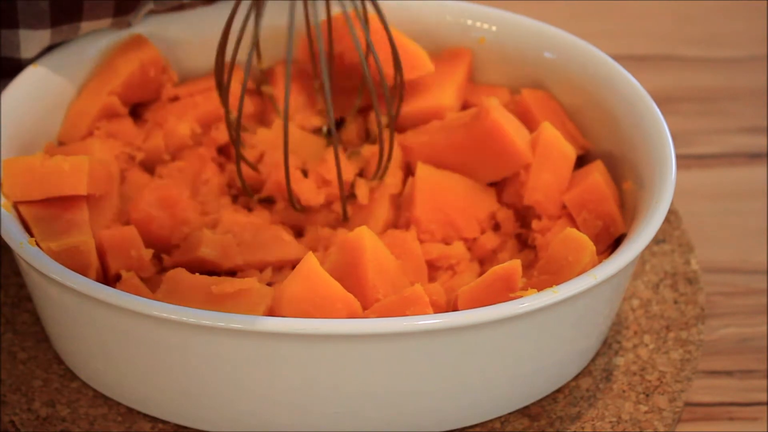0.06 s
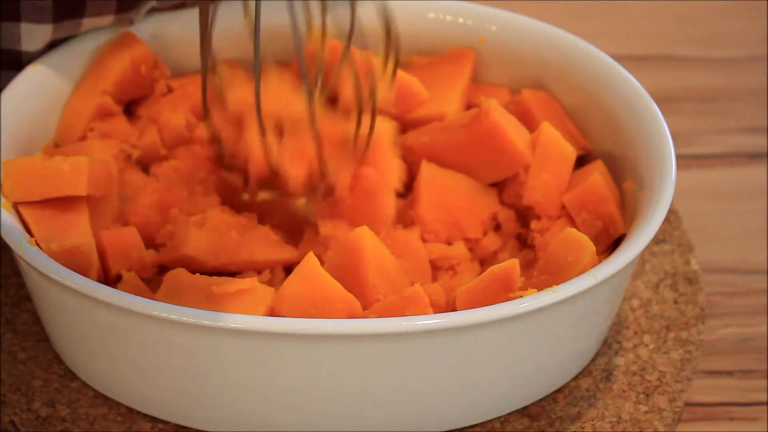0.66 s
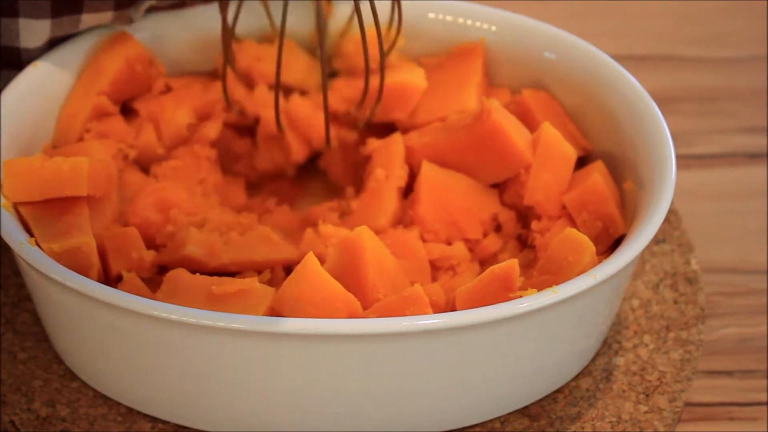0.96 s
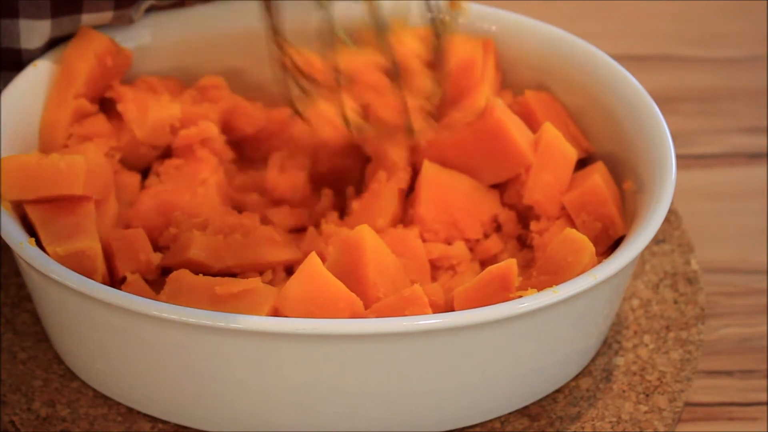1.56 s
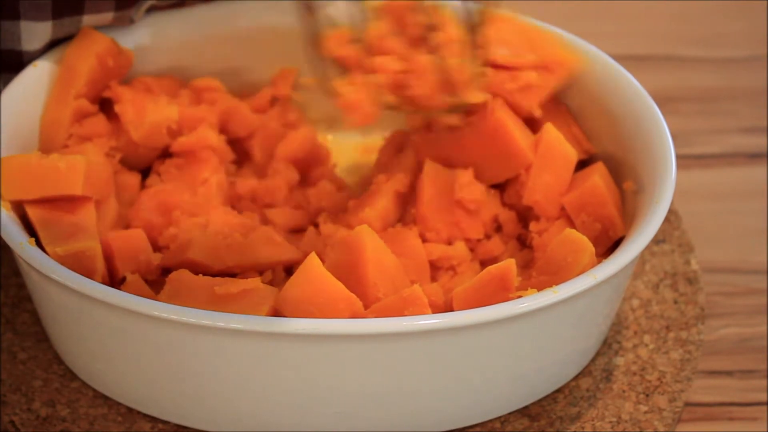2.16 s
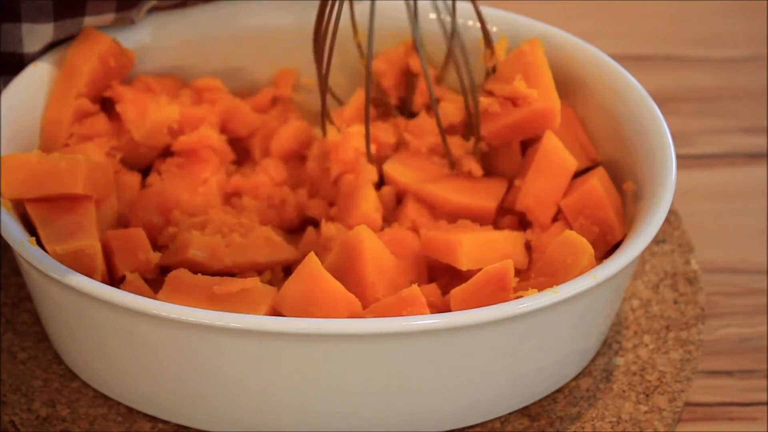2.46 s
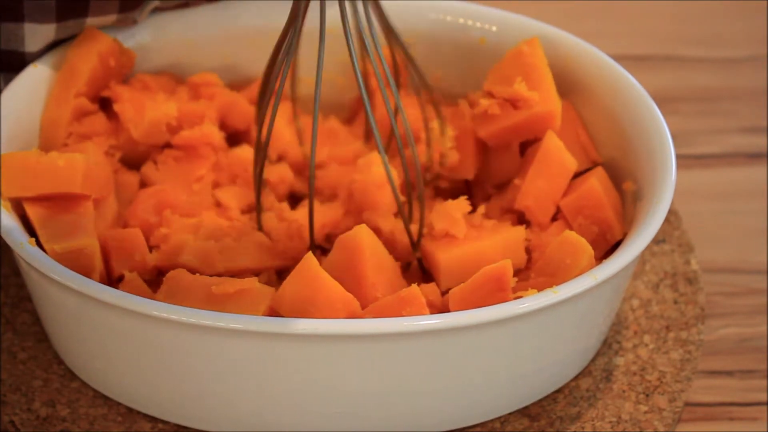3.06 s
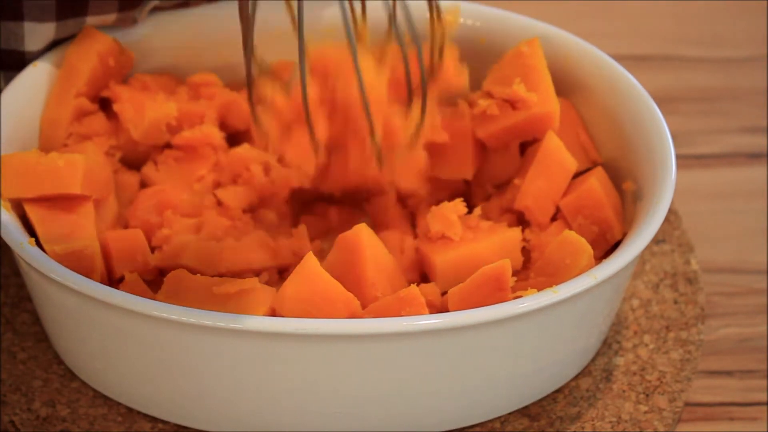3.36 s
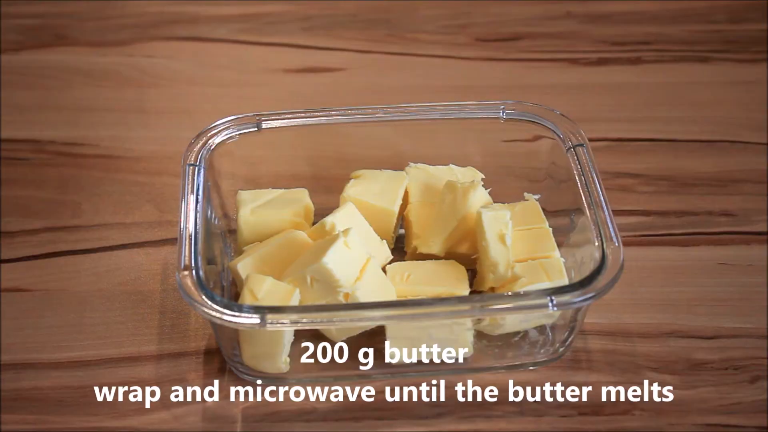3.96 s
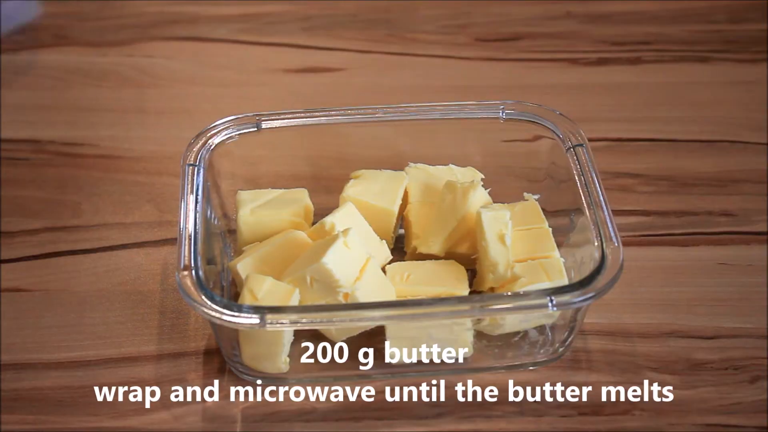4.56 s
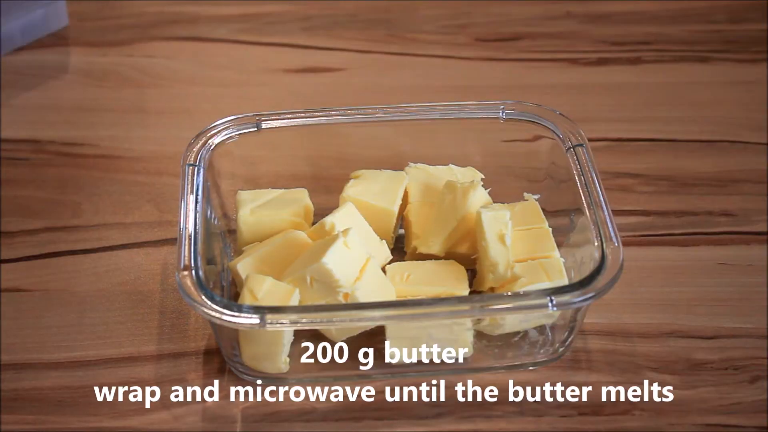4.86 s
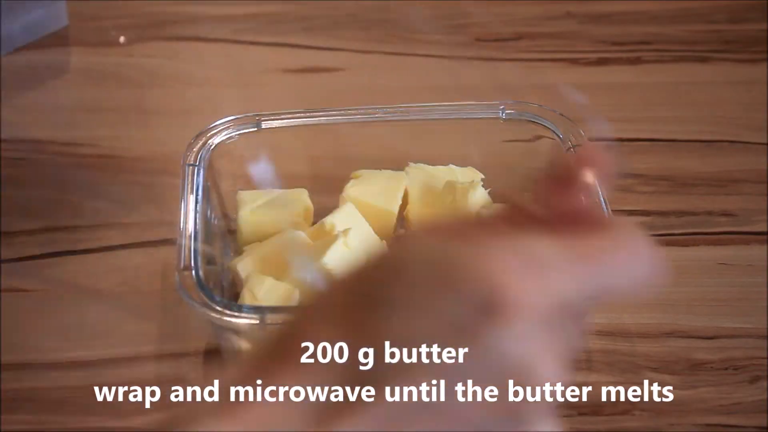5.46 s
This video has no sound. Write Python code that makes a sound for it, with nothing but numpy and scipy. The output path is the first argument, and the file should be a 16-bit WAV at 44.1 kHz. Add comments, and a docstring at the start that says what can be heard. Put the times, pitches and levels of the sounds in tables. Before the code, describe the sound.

From the start, a wire whisk mashes cooked pumpkin in a ceramic dish, close up, over the soft rush of a kitchen. Uneven strokes bring quiet wet squelches, small air pops and a low table rumble. The wires clink on the bottom with dull thumps at about 0.4, 1.2, 1.8, 3.1 and 3.6 seconds. At 0.9 seconds the whisk knocks sharply on the side wall, ringing briefly, and the dish clacks back onto its mat at 1 second. Pops cluster around 2.3 and 3 seconds. The mashing ends near 3.85 seconds, and plastic wrap immediately peels off its roll in crackling tugs, the roll rumbling in its box, strongest around 4.2 seconds. Just after 4.5 seconds the cutter snaps twice in quick succession, loud and briefly echoing. From 5 seconds the loose sheet crinkles faintly until the end at about 5.7 seconds.

```python
"""Cooked pumpkin squelches under a wire whisk: trapped air pops, the wires clink on the ceramic dish
and the table thumps. The lifted whisk knocks the side wall and the dish drops back on its mat.
Then plastic wrap peels off its roll in countless tiny slips, the cutter of the box snaps shut twice
and sets the kitchen reverberating, and the loose sheet crinkles faintly as it is carried over.
A soft rush of the room lies under it all."""
import sys
import numpy as np
from scipy import signal
from scipy.fft import rfft, irfft
from scipy.io import wavfile
from scipy.ndimage import uniform_filter1d

SR = 44100
rng = np.random.default_rng(int(sys.argv[2]) if len(sys.argv) > 2 else 0)


def file_out(sig):
    """Save sig as 16-bit WAV at sys.argv[1]."""
    # one column per channel
    cols = np.atleast_2d(sig).T
    # limit, then scale
    lim = np.clip(cols, -1, 1)
    pcm = np.round(lim * 32767).astype(np.int16)
    wavfile.write(sys.argv[1], SR, pcm)


N = 252252
T = np.arange(N) / SR
AGE = T[:SR]  # seconds since an impact

# Levels in the tables are relative; each source may add a gain of its own.
# spectra of the room's rush, its fainter rush and its echo: frequency_hz, level_db
AIR_TONE = [(20, -34), (60, -7), (150, 1), (240, -9.5), (330, -5), (450, 0), (800, 2), (1300, -6.5),
            (4000, -18), (8000, -22), (16000, -37)]
FAINT_TONE = [(20, -44), (45, -31), (90, -15), (210, -3), (400, -11.5), (800, -10.5), (1700, -21),
              (4000, -22), (8000, -35), (16000, -33)]
ROOM_TONE = [(60, -22), (170, 1), (400, -3.5), (780, -2), (1300, -4), (1800, -1.5), (2500, -8), (3500, -7),
             (5000, -6.5), (7000, -13.5), (11000, -8.5), (16000, -18)]
# course of the fainter rush: time_s, level_db
FAINT_LEVELS = [(3.8, -73), (4.9, -64), (5.25, -58.5), (5.45, -56.5), (5.72, -50)]
# kitchen reverberation: frequency_hz, t60_s
ROOM_T60 = [(150, 0.97), (700, 0.69), (2000, 0.75), (4000, 0.79), (8000, 0.61), (14000, 0.39)]

# tugs on the film: start_s, peel_db, rumble_db, hold_s
TUGS = [(3.9, -38.5, -48, 0.012), (3.971, -33.5, -48, 0.075), (4.084, -22.5, -29, 0.016),
        (4.138, -38.5, -35.5, 0.0087), (4.21, -15, -30, 0.0063), (4.256, -22, -53, 0.064),
        (4.366, -25, -64, .025)]
# the roll sings as it spins on: peak_s, level_db
SPINS = [(4.21, -36), (4.419, -43)]
# the loose sheet flexes: start_s, level_db, rise_s, hold_s
RUSTLES = [(5.015, -43, 0.0037, .005), (5.141, -48, 0.041, 0.083), (5.326, -51.5, .015, 0.0088),
           (5.427, -49, 0.049, 0.0089), (5.517, -44, .025, 0.043), (5.67, -47, .015, 0.03)]
# sharp creases in the film and snaps of the cutter: start_s, level_db
CREASES = [(3.861, -35), (3.909, -30), (4.006, -26), (4.039, -27), (4.0655, -22), (4.111, -22),
           (4.158, -22), (4.179, -18), (4.195, -22), (4.2011, -7), (4.2055, -14), (4.2355, -17),
           (4.2748, -7), (4.3095, -17), (4.3798, -20), (4.5935, -20), (4.598, -19), (4.910, -52),
           (5.0132, -37), (5.139, -42), (5.1715, -36), (5.175, -38), (5.3769, -34), (5.507, -35),
           (5.6977, -36)]
SNAPS = [(4.5209, -3.5), (4.574, -4.5)]
# spectra of peeling film, rumbling and singing roll, creases and cutter: frequency_hz, level_db
PEEL_TONE = [(120, -40), (200, -30), (328, -25.5), (366, -17), (409, -23), (696, -8.5), (1910, -6),
             (3760, 0), (4430, -1), (7270, -2), (10500, -4), (14600, -7.5), (16000, -13)]
ROLL_TONE = [(100, -11), (240, -3), (440, 2.5), (600, -2.5), (1400, -4), (2500, -3), (6000, -48.5)]
SPIN_TONE = [(450, -42), (640, -14.5), (700, -7), (770, -17), (1100, -43)]
CREASE_TONE = [(100, -10), (1000, -5), (3500, 1), (8000, 1.5), (13000, -0.5), (16000, -8.5)]
SNAP_TONE = [(50, -29), (130, -21), (250, -14), (500, -7), (850, -1.5), (1200, -1.5), (1650, 1.5),
             (2400, 0), (3300, -2.5), (4500, -9.5), (7000, -12), (11000, -18), (16000, -24)]

# the dish rocks on its mat: peak_s, level_db, rumble_db
ROCKS = [(.39, -43.5, -45), (.71, -53, -52.5), (1.17, -41.5, -64), (1.29, -56, -60), (1.67, -47, -52),
         (1.85, -44.5, -52), (2.32, -51, -47), (2.56, -50, -65), (3.13, -50, -53), (3.53, -48, -59),
         (3.68, -59, -54)]
# the whisk pushes into the pulp or sucks free: peak_s, squelch_db, treble_db, rise_s, release_s
STROKES = [(0.371, -34, -40, 0.029, 0.04), (.6, -66, -48, 0.12, 0.048), (1.18, -39, -39, 0.058, 0.041),
           (1.335, -47.5, -41.5, 0.02, 0.046), (1.649, -38, -40, 0.035, 0.021),
           (1.783, -37.5, -33.5, 0.04, 0.039), (1.95, -48.5, -48.5, 0.045, 0.073),
           (2.305, -37, -41, 0.048, 0.06), (2.54, -42.5, -44.5, 0.11, 0.046),
           (2.68, -46, -45, 0.025, 0.031), (2.965, -41.5, -40, .025, 0.038),
           (3.03, -34.5, -35, 0.049, 0.048), (3.235, -46, -41, 0.022, 0.031),
           (3.285, -47, -42.5, 0.021, 0.037), (3.508, -34, -34, 0.021, 0.052),
           (3.748, -53, -38.5, .025, 0.021)]
# pulp and trapped air pop between the wires: start_s, level_db, pitch_hz
POPS = [(0.3337, -33, 2280), (0.5135, -37.5, 4630), (0.582, -38, 4560), (1.3318, -31, 1693),
        (1.582, -22.5, 2000), (1.721, -39.5, 1850), (1.9413, -29, 5410), (2.208, -36.5, 9000),
        (2.2767, -24.5, 2740), (2.298, -22, 1780), (2.3053, -20.5, 3050), (2.3211, -20.5, 4050),
        (2.3515, -27, 4400), (2.4607, -34, 2293), (2.5789, -33.5, 2210), (2.685, -32.5, 2150),
        (2.7712, -30, 4970), (2.938, -32.5, 3950), (3.02, -21, 3700), (3.0158, -22.5, 2760),
        (3.034, -20, 3450), (3.0529, -21, 2640), (3.26, -22.5, 6240)]
# wires hit the bottom of the dish: start_s, level_db, pitch_hz, thump_db, ring_db
CLINKS = [(0.3806, -13.5, 5030, -33, -33.5), (0.3867, -19, 5600, -36, -43), (1.139, -32, 5000, -51, -37.5),
          (1.1596, -27, 6000, -41, -44), (1.1915, -20.5, 1200, -33.5, -38), (1.789, -22, 3400, -46, -43),
          (1.793, -12, 4870, -31.5, -32), (1.8, -22.5, 3600, -36.5, -40), (2.543, -26.5, 4500, -44, -42.5),
          (3.0605, -17.5, 2800, -44, -30), (3.065, -21, 2600, -51, -35.5), (3.559, -9.5, 3500, -30, -31.5)]
# juice spurts, wires knock and graze the side wall, the dish drops back: start_s, level_db
SPURTS = [(.603, -35), (.612, -28.5), (1.317, -36.5), (1.638, -31), (1.756, -34), (2.306, -26.5),
          (2.727, -38), (3.001, -23.5), (3.2795, -25.5), (3.4943, -22), (3.748, -32)]
KNOCKS = [(0.901, -7.5)]
GRAZES = [(0.891, -35), (.9945, -40), (1.013, -35)]
CLACKS = [(1.002, -29), (1.0072, -11)]
# spectra of rocking dish, rumbling table, dropped dish, pulp, juice and wires: frequency_hz, level_db
ROCKING_TONE = [(30, -35), (85, -34), (122, -2), (160, -4), (220, -13), (320, -5), (500, -22.5),
                (1500, -44)]
RUMBLE_TONE = [(20, -28.5), (45, -13), (62, 3), (90, -4), (200, -37.5), (600, -70)]
CLACK_TONE = [(88, -66), (150, -40), (821, -7.5), (979, -14.5), (1210, -1.5), (1420, -12), (1690, 2),
              (2020, -21), (2220, -8), (5790, -12.5), (7040, -21), (8730, -26), (13200, -31), (14500, -22),
              (16000, -38)]
PULP_TONE = [(300, 0), (900, 1), (2400, 4.5), (5000, -4), (7000, -2.5), (10000, -9), (16000, -58.5)]
JUICE_TONE = [(800, -25), (2500, -6.5), (5500, 4.5), (8000, -2), (13500, 1.5), (16000, -5.5)]
CLINK_TONE = [(200, -0.5), (700, -6.5), (1500, -10.5), (2500, -18.5), (4800, 9.5), (6300, 12.5),
              (8000, 3.5), (11000, 6.5), (16000, 4.5)]
# a pop and a wire's contact at -2, -1, +1 and +2 octaves from their pitch: level_db
POP_SKIRTS_DB = [-16.5, -9., -12, -18.5]
CONTACT_SKIRTS_DB = [-8.5, -1, -4, -5]

# modes of the dish, its side wall, the table, the wires and the box: frequency_hz, level_db, t60_s
DISH_MODES = [(1000, -3, 0.26), (1537, -0.5, 0.12), (2283, -11, 0.31), (2467, -3, 0.27), (2599, -5, 0.21),
              (3597, -1, 0.22), (3736, -1.5, 0.18), (4660, -6.5, 0.1), (4880, -3, 0.072), (5630, -16, 0.46),
              (6190, -3.5, 0.083), (6180, -6.5, 0.17), (7450, -9, 0.19), (10020, -1, 0.16),
              (10660, -10.5, 0.147), (12600, -3, .12), (13880, 1.5, 0.067)]
SIDE_WALL_MODES = [(1030, -12, 0.33), (1380, -7, .15), (2104, -1, 0.41), (3740, -7, 0.85), (5000, -9, 0.19),
                   (5100, -11, 0.53), (6568, -27, 0.27), (7560, -6, 0.24)]
TABLE_MODES = [(59, -20, 0.45), (122.3, -2.5, 0.35), (163, -7.5, 0.31), (193, -14, 0.07), (299.5, -3, 0.11),
               (352.8, -2, 0.12)]
WIRE_MODES = [(557, -9, 0.024), (1062, -2, 0.034), (1306, -2, 0.059), (2203, 9.5, 0.027), (2261, 10, 0.027),
              (3630, 0, 0.028), (5590, -2.5, 0.018), (6300, 6.5, 0.011), (6670, -0.5, 0.025),
              (7750, -9, 0.031), (10550, 10, 0.0035), (12100, 0, 0.012), (13600, 3.5, 0.014)]
BOX_MODES = [(120, -12, .04), (240, -13, .04), (380, -9, .05), (520, -8, .04), (797, -2, .05),
             (1165, -2, .05), (1360, -2, .04), (1756, -1, .05), (2193, 0, .025), (2600, -1, .025),
             (2954, -1, .03), (3371, -2, .04), (3976, -7, .03), (4842, -8, .03)]

GRAIN_HZ, GRAIN_SKIRT_DB = (2200, 4500, 8200, 13400), -10  # pitches of tiny clicks; level an octave away
MASHING_ENDS_S, MASHING_FADE_S = 3.85, 0.022
ROLL_START_S, ROLL_STOP_S = 3.86, 4.5


def undb(db):
    """Decibels to amplitude ratio."""
    return 10 ** (np.asarray(db) / 20)


def unit(x):
    """Normalise to rms 1."""
    return x / np.sqrt(np.mean(x ** 2))


def blow(x):
    """Normalise a transient so that its loudest 2 ms have rms 1."""
    return x / np.sqrt(uniform_filter1d(x ** 2, size=88).max())


def add(out, s, x):
    """Superpose x on out at time s."""
    i = int(s * SR)
    out[i:i + len(x)] += x[:N - i]


def fade(t60):
    """Exponential decay by 60 dB in t60 seconds."""
    return np.exp(-np.log(1000) * AGE / t60)


def burst(t60):
    """Exponentially decaying white noise."""
    return rng.standard_normal(SR) * fade(t60)


def swell(s, rise_s, hold_s, release_s):
    """Exponential growth until time s, a plateau, then exponential decay."""
    growth = np.minimum(T - s, 0) / max(rise_s, 1e-3)
    decay = np.maximum(T - s - hold_s, 0) / max(release_s, 1e-3)
    return np.exp(growth - decay)


def together(envelopes):
    """Incoherent sources add in power."""
    return np.sqrt(sum(e ** 2 for e in envelopes))


def colour(x, tone, size=4096):
    """Minimum-phase filter through points of frequency_hz, level_db."""
    hz, db = np.transpose(tone)
    log_hz = np.log(np.arange(size // 2 + 1) * SR / size + 1)
    log_gain = np.log(undb(np.interp(log_hz, np.log(hz), db)))
    cepstrum = irfft(log_gain)[:size // 2]
    cepstrum[1:] *= 2
    return signal.fftconvolve(x, irfft(np.exp(rfft(cepstrum, size))))[:len(x)]


def noise(tone):
    """Gaussian noise with the given spectrum, rms 1."""
    return unit(colour(rng.standard_normal(N), tone))


def peak(hz, skirts_db):
    """Band-pass spectrum centred on hz."""
    return list(zip(hz * 2. ** np.arange(-2, 3), np.insert(skirts_db, 2, 0)))


def ring(modes, scatter_db, detune):
    """Damped normal modes: the place of the blow changes their share, the load shifts their pitch."""
    return sum(undb(db + scatter_db * rng.standard_normal()) * fade(t60) * rng.choice([-1, 1])
               * np.sin(2 * np.pi * hz * (1 + detune * rng.standard_normal()) * AGE)
               for hz, db, t60 in modes)


def crackle(per_s, spread_db):
    """Shot noise: clicks at random moments, a few much larger than the rest; steady rms 1."""
    size = undb(spread_db * np.minimum(rng.exponential(size=N), 4))
    clicks = (rng.random(N) < per_s / SR) * size * rng.choice([-1, 1], N)
    return clicks / np.sqrt(uniform_filter1d(clicks ** 2, size=3000).clip(1e-3))


def grains(per_s, spread_db, tone):
    """Shot noise of tiny clicks, scattered independently over several pitch bands; rms 1."""
    low_pass = [(GRAIN_HZ[0] / 2, 0), (GRAIN_HZ[0], GRAIN_SKIRT_DB)]
    clicks = colour(crackle(per_s, spread_db), low_pass, size=256)
    for hz in GRAIN_HZ:
        band = [(hz / 2, GRAIN_SKIRT_DB), (hz, 0), (hz * 2, GRAIN_SKIRT_DB)]
        clicks += colour(crackle(per_s / len(GRAIN_HZ), spread_db), band, size=256)
    return unit(colour(clicks, tone))


def room_rush():
    """Broadband ambient noise: one rush fades with the mashing, a fainter one grows after it."""
    air = undb(-51) * swell(0, 0, hold_s=3.714, release_s=0.18)
    faint = undb(np.interp(T, *np.transpose(FAINT_LEVELS)))
    return air * noise(AIR_TONE) + faint * noise(FAINT_TONE)


def kitchen_echo(x):
    """Reverberation: hard walls build a diffuse field whose treble dies first."""
    hz, t60 = np.transpose(ROOM_T60)
    spectrum = rfft(rng.standard_normal(SR))
    log_hz = np.log(np.arange(SR // 2 + 1) + 1)
    tail = sum(irfft(spectrum * np.interp(log_hz, np.log(hz), band), SR) * fade(t)
               for band, t in zip(np.eye(len(hz)), t60))
    tail = colour(tail * (1 - fade(0.0098)) * (1 + 2 * fade(0.3)), ROOM_TONE)
    return signal.fftconvolve(x, tail / np.sqrt(np.sum(tail ** 2)))[:N]


def rocking_dish():
    """Structure-borne sound: each push shifts the dish on its mat and the table rumbles."""
    hand_weight = undb([[-55.5], [-71.5]]) * swell(0, 0, MASHING_ENDS_S, MASHING_FADE_S)
    pushes = [undb([[db], [rumble_db]]) * swell(s, 0.038, 0, 0.056) for s, db, rumble_db in ROCKS]
    rocking, rumble = together([hand_weight] + pushes)
    return rocking * noise(ROCKING_TONE) + rumble * noise(RUMBLE_TONE)


def crinkling_sheet():
    """Buckling: the flexing film rustles in tiny clicks and sharp creases tick singly."""
    flex = together(undb(db) * swell(s, rise, hold, release_s=0.046) for s, db, rise, hold in RUSTLES)
    out = flex * grains(5000, 5.8, CREASE_TONE)
    for s, db in CREASES:
        add(out, s, undb(db + 1) * blow(colour(burst(0.003) + 0.12 * burst(0.025), CREASE_TONE)))
    return out


def unrolling_film():
    """Stick-slip: film lets go in countless tiny slips while the roll rumbles and sings in its box."""
    drag = undb([[-46.5], [-51.5]]) * swell(ROLL_START_S, 0.0074, ROLL_STOP_S - ROLL_START_S, 0.0042)
    tugs = [undb([[db], [rumble_db]]) * swell(s, 0.009, hold, 0.03) for s, db, rumble_db, hold in TUGS]
    peel, rumble = together([drag] + tugs)
    spin = together(undb(db) * swell(s, 0.049, 0, 0.034) for s, db in SPINS)
    return (peel * unit(colour(crackle(9000, 4.7), PEEL_TONE))
            + undb(2) * rumble * unit(colour(crackle(1500, 1.6), ROLL_TONE))
            + spin * noise(SPIN_TONE))


def cutter():
    """Impulse excitation: each snap is a crack that rings the modes of the hollow box."""
    out = np.zeros(N)
    for s, db in SNAPS:
        crack = blow(colour(burst(0.0088) + 0.14 * burst(0.033), SNAP_TONE))
        box = blow(ring(BOX_MODES, 1, 0.00089))
        add(out, s, undb(db) * (crack + undb(-10.5) * box))
        # the lid scrapes just before it catches
        out += undb(db - 22) * swell(s, 0.0023, 0, 0.0011) * noise(SNAP_TONE)
    return out


def dropping_dish():
    """Damped impact: the dish falls back on its mat with a clack and one brief tone."""
    out = np.zeros(N)
    for s, db in CLACKS:
        impact = burst(0.0041) + 0.44 * burst(0.032) + 0.031 * burst(0.31)
        add(out, s, undb(db) * blow(colour(impact, CLACK_TONE)))
        add(out, s, undb(db - 15) * ring([(1696, 0, 0.09)], 0.4, 0.0018))
    return out


def pops_and_spurts():
    """Cavity resonance gives each air pop its pitch; spurting juice is a ragged burst of noise."""
    out = np.zeros(N)
    for s, db, hz in POPS:
        cavity = peak(hz, POP_SKIRTS_DB)
        add(out, s, undb(db) * blow(colour(burst(0.0081) + 0.08 * burst(0.071), cavity)))
    for s, db in SPURTS:
        spray = burst(0.051) * undb(7 * rng.standard_normal(SR))
        add(out, s, undb(db) * blow(colour(spray, JUICE_TONE)))
    return out


def bubbles(effort, per_s=72, low_hz=2490, high_hz=13000):
    """Each bursting bubble is a damped oscillator, louder where the pulp is worked harder."""
    out, age = np.zeros(N), AGE[:400]
    for when, pitch, size in rng.random((int(per_s * MASHING_ENDS_S), 3)):
        s = when * MASHING_ENDS_S
        hz = low_hz * (high_hz / low_hz) ** pitch
        tick = np.sin(2 * np.pi * hz * age) * np.exp(-hz * age / 2.9)
        add(out, s, undb(-2 + 22 * size) * effort[int(s * SR)] * tick)
    return out


def squelching_pulp():
    """Modulated shot noise: wet crackle swells with each stroke and sinks to a seep in between."""
    seep = undb([[-58], [-59.5]]) * swell(0, 0, MASHING_ENDS_S, MASHING_FADE_S)
    strokes = [undb([[db], [treble_db]]) * swell(s, rise, 0.0035, release)
               for s, db, treble_db, rise, release in STROKES]
    body, treble = together([seep] + strokes)
    pulp = undb(-2.5) * body * unit(colour(crackle(2200, 3.15), PULP_TONE))
    juice = undb(0.5) * treble * grains(3200, 4.7, JUICE_TONE)
    ticks = bubbles(np.sqrt(body * treble))
    # wires dragging through the pulp also sound the dish
    dish = signal.fftconvolve(crackle(3000, 6.3), ring(DISH_MODES, 0.9, 0.0029) * fade(0.047))[:N]
    return pulp + juice + ticks + undb(-9) * body * unit(dish)


def whisk_on_wall():
    """Free vibration: a knock rings the wires briefly and the side wall longer; grazes only scrape."""
    out = np.zeros(N)
    for s, db in KNOCKS:
        wires = ring(WIRE_MODES, 0.29, 0.0012) * (1 - fade(0.0039))
        wall = ring(SIDE_WALL_MODES, 0.55, 0.00185) + 0.5 * ring(SIDE_WALL_MODES, 0.6, 0.0053)
        pulp = colour(burst(0.022), PULP_TONE)
        table = ring(TABLE_MODES, 0.9, 0.0072)
        for part, gain_db in (wires, -3.5), (wall, -23), (pulp, -15), (table, -29.5):
            add(out, s, undb(db + gain_db) * blow(part))
    for s, db in GRAZES:
        add(out, s, undb(db) * blow(colour(burst(0.031), CLINK_TONE)))
    return out


def whisk_on_bottom():
    """Impact excitation: wires chatter on the glaze and drive the modes of the dish and the table."""
    out = np.zeros(N)
    for s, db, hz, thump_db, ring_db in CLINKS:
        contact = peak(hz, CONTACT_SKIRTS_DB)
        chatter = blow(colour(burst(0.016), CLINK_TONE))
        # the pulp soaks up most of the ring at once, the rest lingers
        strike = blow(ring(DISH_MODES, 1, 0.0065) * fade(0.027))
        lingering = ring(DISH_MODES, 0.93, 0.00304) + 0.5 * ring(DISH_MODES, 1, 0.0089)
        clink = (strike + undb(1.5) * chatter) * (1 - fade(0.0013))
        thump = blow(ring(TABLE_MODES, 0.4, 0.023)) * (1 - fade(0.018))
        add(out, s, undb(db) * blow(colour(clink, contact)))
        add(out, s, undb(ring_db + 2) * blow(colour(lingering, contact)))
        add(out, s, undb(thump_db + 4.5) * thump)
    return out


def scene():
    """Direct and reverberant sound superpose: whisk and film are close, the cutter fills the room."""
    mashing = whisk_on_bottom() + whisk_on_wall() + dropping_dish()
    mashing += pops_and_spurts() + squelching_pulp() + rocking_dish()
    film = unrolling_film() + crinkling_sheet()
    snaps = cutter()
    echo = kitchen_echo(undb(-15.5) * mashing + undb(-19) * film + undb(-8) * snaps)
    return (mashing + film + snaps + echo + room_rush())[None]


def record(dry):
    """Hard clipping limits the loudest peaks; a low-pass filter cuts the top at 15.8 kHz."""
    low_pass = signal.ellip(10, 0.2, 70, 15800, fs=SR, output="sos")
    return signal.sosfilt(low_pass, np.clip(dry, -1, 1))


dry = scene()
out = record(dry)
file_out(out)
```